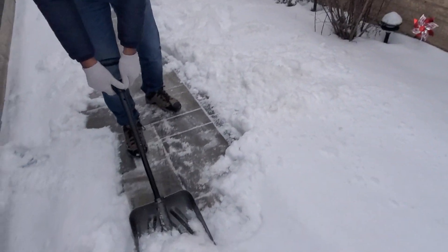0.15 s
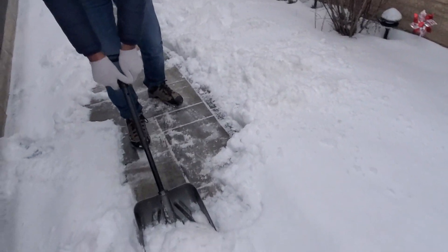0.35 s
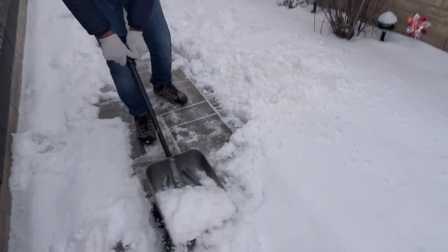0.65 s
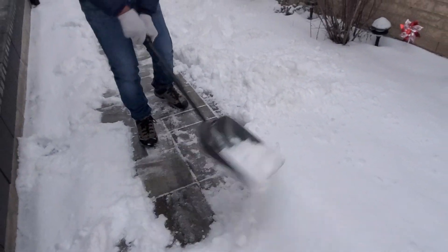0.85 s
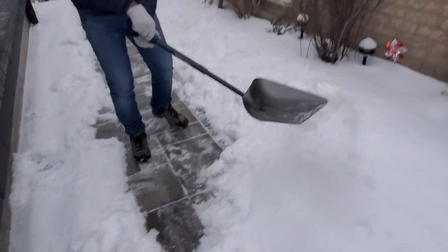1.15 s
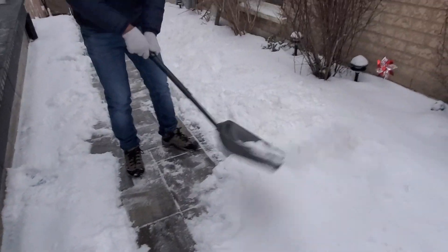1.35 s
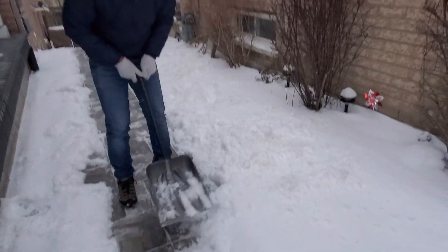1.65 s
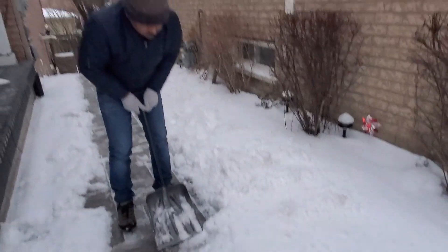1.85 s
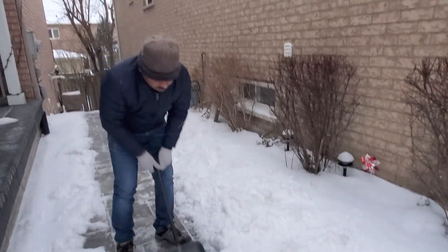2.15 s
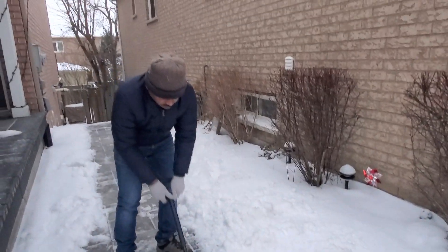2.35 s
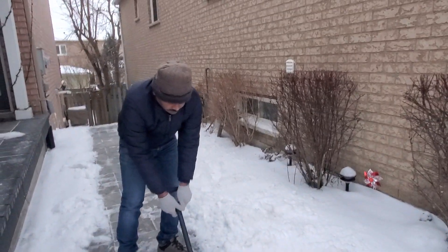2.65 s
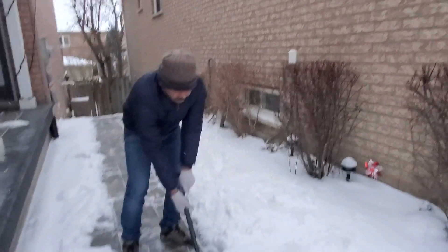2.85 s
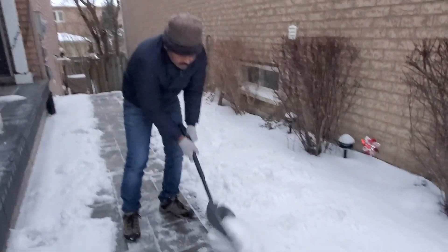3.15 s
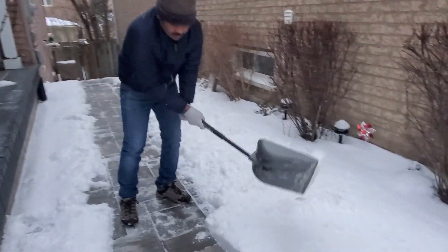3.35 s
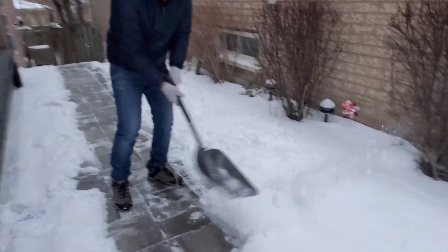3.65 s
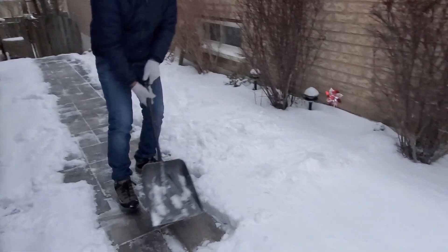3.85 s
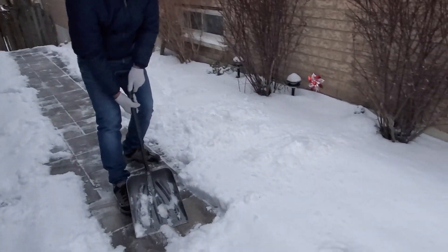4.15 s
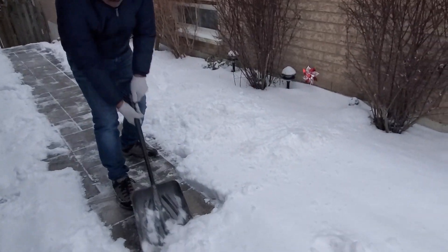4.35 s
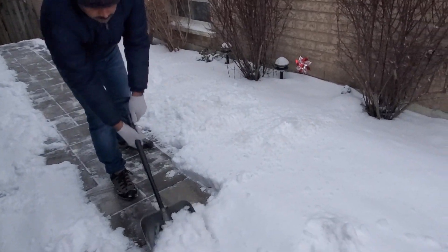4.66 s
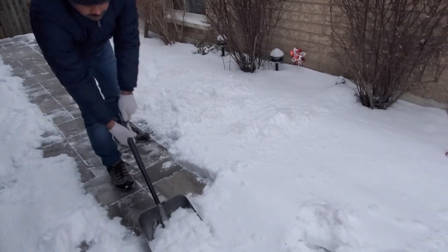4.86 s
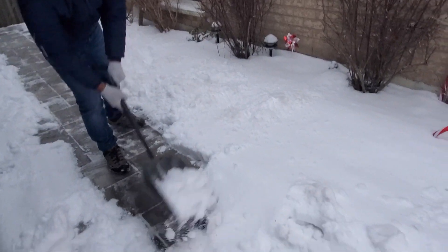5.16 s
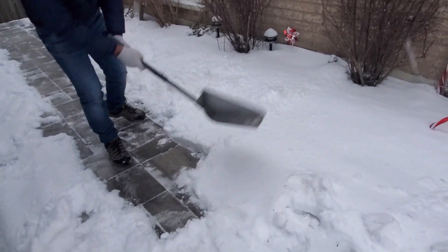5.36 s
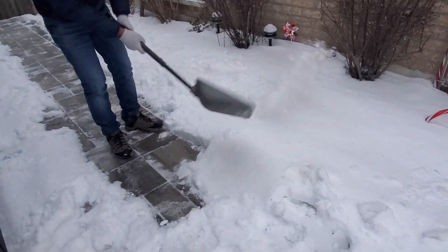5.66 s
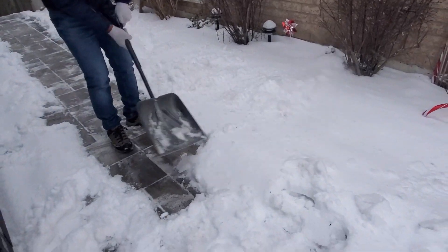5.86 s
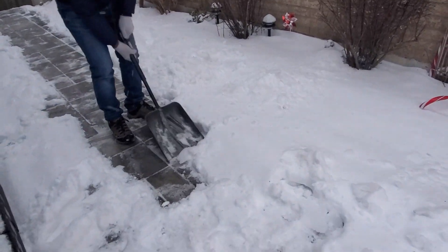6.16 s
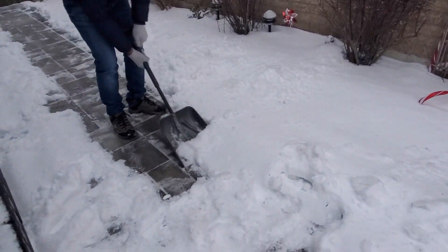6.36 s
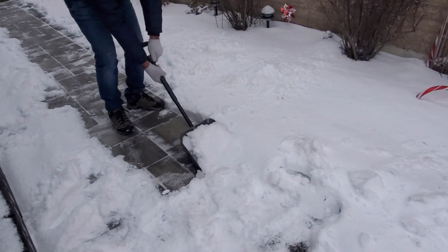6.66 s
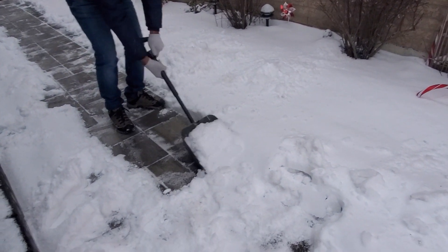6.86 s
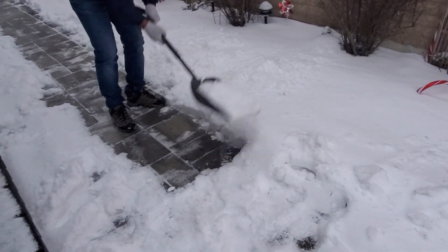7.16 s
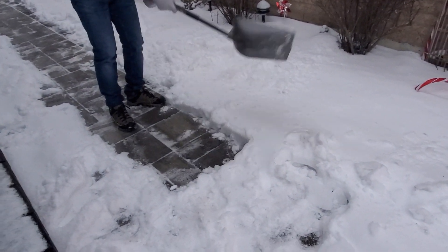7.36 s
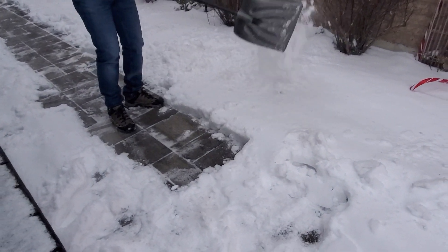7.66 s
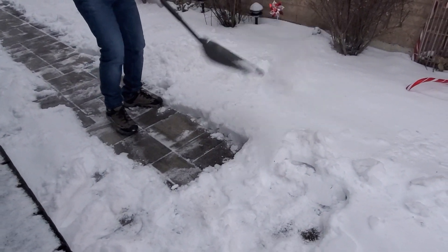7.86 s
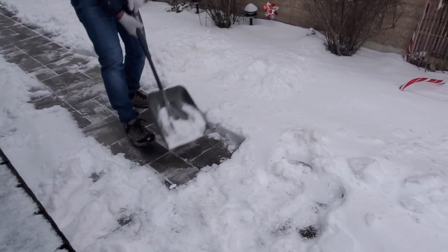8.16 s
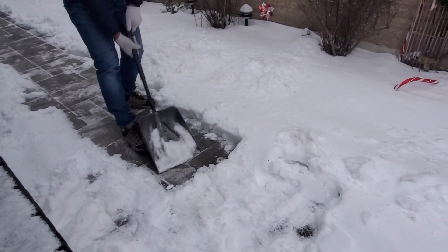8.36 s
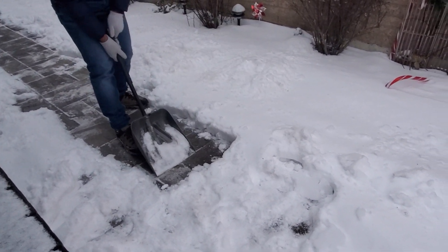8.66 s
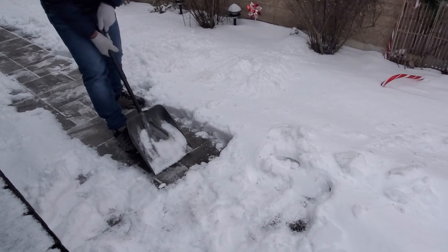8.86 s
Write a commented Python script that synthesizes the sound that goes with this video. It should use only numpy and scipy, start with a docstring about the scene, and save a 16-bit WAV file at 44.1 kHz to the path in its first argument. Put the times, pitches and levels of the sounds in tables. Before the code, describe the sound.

Close outdoor shoveling in a narrow yard between brick walls. A plastic blade rasps over pavers and packs creaking snow, its hollow scoop droning. Pauses follow each shove while thrown snow patters down and boots tap dully. The sharpest cracks and knocks come near the middle, another cluster at six seconds, then gentler scrapes. Wind thumps unevenly on the stereo microphones a few steps away, over faint distant traffic.

```python
"""A plastic snow shovel scrapes over pavers in a narrow yard between two brick houses.
Grains of random clicks drive its edge, scoop and packing snow; joints give bursts that crack and knock.
Hollow bumps ring one mode, thrown snow patters as filtered clicks, boots and handle tap without ringing.
Light wind buffets two microphone ports a few steps away: filtered noise and single pressure swings.
Behind lie a murmur of distant traffic and a far wash, both filtered noise with slow level curves."""
import sys
import numpy as np
from scipy import signal
from scipy.fft import rfft, irfft
from scipy.io import wavfile
from scipy.ndimage import uniform_filter1d, map_coordinates

SR = 44100
rng = np.random.default_rng(int(sys.argv[2]) if len(sys.argv) > 2 else 0)


def int16_out(signal):
    """Quantize to a 16-bit WAV file."""
    q = np.round(np.clip(np.atleast_2d(signal).T, -1, 1) * 32767)
    wavfile.write(sys.argv[1], SR, q.astype(np.int16))


N = 397341
T = np.arange(N) / SR  # s
CONTROL_T = np.arange(0, N / SR, 1 / 1000)  # s, axis of the slow envelopes

# Levels in the tables are relative; some sources, such as the knocks and crunches, add a trim.
# scrape of the edge: [f/Hz, level/dB]
GRIND_SPECTRUM = [(60, -27), (200, -4), (400, -4.5), (950, -13), (1450, 1), (2100, 6), (3200, 1), (4300, 3),
                  (5500, -0.5), (7200, 1.5), (9200, -17.5), (12000, -23), (16000, -6)]
# drone of the blade: [f/Hz, level/dB]
DRONE_SPECTRUM = [(80, -32), (160, -1), (270, -8.5), (420, -7), (700, 7.5), (980, -17.5), (1400, -8),
                  (4000, -25.5)]
# fizz of crushed snow: [f/Hz, level/dB]
FIZZ_SPECTRUM = [(1000, -43), (4000, -2), (7500, -2), (9400, -6.5), (11500, -8.5), (13500, -8.5),
                 (16000, -14.5)]
# modes of the plastic scoop: [f/Hz, level/dB, t60/s]
SCOOP_MODES = [(152, -2, 0.027), (230, -1.5, 0.023), (390, 0.5, 0.043), (468, -6, 0.076),
               (578, -1.5, 0.062), (690, 5, 0.029), (783, 0.5, 0.04), (958, 2, 0.041), (1110, -4, 0.02)]
RATTLE_SPREAD_DB = 1  # unevenness of the grains that shake the scoop


def scraping(grind_db=-1, body_db=-7, fizz_db=-1, pack_db=-1, scoop_db=-2, judder_db=0.5, note_drift=0.013):
    """Stick-slip judder modulates grind, song and scoop; crushed snow has its own judder."""
    (bite, stone, push, crush, pack), note, edge_note = shoves()
    slip = unit(amp(judder_db * waver(per_s=7.5)))
    crush_judder = unit(amp(judder_db * waver(per_s=13)))

    grind = through(bite * slip * grains(per_s=7000, spread_db=3), colour(GRIND_SPECTRUM))
    sing = stone * slip * singing(edge_note)
    fizz = through(crush * crush_judder * grains(per_s=6600, spread_db=1), colour(FIZZ_SPECTRUM))

    shake = slip * grains(per_s=1500, spread_db=RATTLE_SPREAD_DB)
    drifting_note = note * (1 + note_drift * waver(per_s=25))
    bare = np.tanh(stone / (push + 1e-9)) ** 2  # 0 on snow, towards 1 on stone
    hollow = push * hollow_note(shake, drifting_note, bare)
    body_drive = push * slip * grains(per_s=900, spread_db=RATTLE_SPREAD_DB)
    body = through(body_drive, colour(DRONE_SPECTRUM))
    # bare stone also rattles the scoop modes
    scoop_drive = stone * slip * grains(per_s=900, spread_db=2 * RATTLE_SPREAD_DB)
    scoop = through(scoop_drive, ring(SCOOP_MODES))

    rasp = amp(grind_db) * grind + sing + amp(fizz_db) * fizz + grit(np.hypot(bite, stone))
    blade = hollow + amp(body_db) * body + amp(scoop_db) * scoop
    return rasp + blade + amp(pack_db) * pack * creaking()


# shoves of the blade, with load- and angle-dependent notes:
# [full pressure t/s, rise/s, hold/s, release/s, grit level/dB, bare-stone level/dB, drone level/dB,
#  fizz level/dB, creak level/dB, hollow note f/Hz, edge note f/Hz]
SHOVES = [(0.005, 0.078, 0.021, 0.48, -43.5, -47.5, -46.5, -54, -45, 644, 2670),
          (0.22, 0.22, 0.053, 1, -65, -68, -61, -76, -48.5, 655, 2700),
          (0.516, 0.0029, 0.022, 0.16, -43, -48, -48, -44.5, -50, 660, 2040),
          (0.755, 0.39, 0.038, 0.3, -39.5, -50, -47, -47.5, -42.5, 627, 2860),
          (1.831, 0.034, 0.022, 0.34, -46, -46, -44, -45, -61, 440, 1950),
          (2.03, 0.35, 0.13, 0.23, -44.5, -38.5, -39.5, -44.5, -43.5, 535, 2150),
          (2.146, 0.057, 0.077, 0.49, -40.5, -41.5, -45.5, -44.5, -49, 680, 2440),
          (2.306, 0.21, 0.047, 0.59, -48.5, -44.5, -55, -47.5, -52, 717, 2520),
          (3.234, 0.31, 0.046, 0.38, -51, -48.5, -50.5, -49, -56, 620, 2810),
          (3.358, 0.14, 0.12, 0.64, -45, -59, -44.5, -48.5, -47, 620, 2530),
          (3.548, 0.21, 0.15, 0.5, -52.5, -49.5, -51, -47, -49, 683, 3100),
          (4.019, 0.0058, 0.31, 0.26, -57, -48, -54.5, -50.5, -79, 880, 2550),
          (4.225, 0.066, 0.065, 0.11, -55, -43, -56, -44, -73, 804, 2050),
          (4.343, 0.14, 0.021, 0.31, -32, -32.5, -49, -35, -59, 630, 3300),
          (4.483, 0.093, 0.0072, 0.27, -32, -35.5, -40, -47, -58, 707, 2770),
          (4.564, 0.034, 0.058, 0.16, -52, -45, -40.5, -52, -72, 895, 2870),
          (4.777, 0.41, 0.047, 0.81, -43, -52, -42, -45, -57, 535, 3160),
          (4.916, 0.11, 0.058, 0.32, -42.5, -44.5, -42, -63, -47, 566, 2850),
          (6.082, 0.055, 0.033, 0.26, -58, -43, -53, -49, -64, 580, 3080),
          (6.175, 0.11, 0.093, 1, -52, -40, -48, -44.5, -55, 670, 2800),
          (6.591, 0.58, 0.064, 0.22, -36.5, -55, -41, -43.5, -47, 728, 2750),
          (7.906, 0.03, 0.2, 1, -59.5, -67, -57, -51.5, -63, 659, 3260),
          (8.305, 0.43, 0.26, 0.39, -50.5, -70, -48.5, -54, -51.5, 642, 2600),
          (8.605, 0.2, 0.11, .3, -51.5, -54, -48.5, -57, -46.5, 624, 2600),
          (8.787, 0.28, 0.017, 0.25, -39, -43, -40.5, -42.5, -42, 594, 2630),
          (8.927, 0.013, 0.035, 0.44, -51.5, -48.5, -44.5, -48, -67, 500, 2240)]


def shoves():
    """One pressure swell per shove drives edge, blade and snow; stronger shoves weigh more in the notes."""
    pressure = np.array([swell(*row[:4]) for row in SHOVES])
    *_, grit_db, stone_db, drone_db, fizz_db, pack_db, hollow_hz, edge_hz = np.transpose(SHOVES)
    gains = [overlap(pressure, db) for db in (grit_db, stone_db, drone_db, fizz_db, pack_db)]
    hollow_track = leading(pressure, drone_db, hollow_hz)
    edge_track = leading(pressure, stone_db, edge_hz)
    return gains, hollow_track, edge_track


# modes of the stiff scraping edge, before bending: [f/Hz, level/dB, t60/s]
EDGE_MODES = [(2047, 12.5, 0.024), (2220, 7, 0.021), (2444, 7, 0.026), (2592, 6, 0.038), (2770, 8, 0.014),
              (2990, 7.5, 0.034), (3298, 5.5, 0.038), (3890, 8, 0.025), (4250, 6, 0.035), (4660, 4, 0.024),
              (6020, 5, 0.018), (6900, -12, 0.029)]
EDGE_FLEX = 0.012  # rms share by which the modes drift as the edge bends
EDGE_SHIFT_DB = 1.8  # rms swell and fade of each mode as the contact point moves
EDGE_FOCUS_DB = 4.5  # fall per octave away from the edge note


def singing(edge_note, rasp_db=-8, rasp_width_hz=900, edge_low_hz=1750):
    """Edge on bare stone: the blade's angle picks among drifting modes and sets a broad rasp."""
    drive, modes = grains(per_s=2100, spread_db=1), np.zeros(N)
    for hz, db, t60 in EDGE_MODES:
        focus_db = -EDGE_FOCUS_DB * abs(np.log2(hz / edge_note))
        level_db = db + EDGE_SHIFT_DB * waver(per_s=3.8) + focus_db
        modes += amp(level_db) * through(drive, ring([(hz, 0, t60)]))
    read_at = np.cumsum(1 + EDGE_FLEX * waver(per_s=4))  # varying speed bends the pitch
    bent = map_coordinates(modes, [read_at], order=2, mode="mirror")
    sing = unit(bent) + amp(rasp_db) * resonate(drive, edge_note, rasp_width_hz)
    # the narrow edge radiates only treble
    high_pass = signal.butter(4, edge_low_hz, "highpass", fs=SR, output="sos")
    return unit(signal.sosfilt(high_pass, sing))


def hollow_note(shake, note, bare, narrow_hz=75, wide_hz=330, overtone_db=-13):
    """Scoop note: clear when it rides on snow, blurred by rattling on bare stone."""
    overtone = resonate(shake, 2 * note, 2 * narrow_hz)
    clear = resonate(shake, note, narrow_hz) + amp(overtone_db) * overtone
    blurred = resonate(shake, note, wide_hz)
    return np.sqrt(1 - bare) * clear + np.sqrt(bare) * blurred


GRIT_HZ, GRIT_CYCLES = (900, 9000), 3  # nominal range of notes; cycles to decay by 1/e


def grit(force, grit_db=-9, pops_per_s=260, clump_db=2.5, count=20):
    """Grit and ice crystals burst under the edge in clumps, each on one of a set of short notes."""
    t, clumps = T[:400], unit(amp(clump_db * waver(per_s=33)))
    out = np.zeros(N)
    for hz in np.geomspace(*GRIT_HZ, count) * rng.uniform(0.95, 1.05, count):
        decay = np.exp(-hz * t / GRIT_CYCLES)
        pop = np.sin(2 * np.pi * hz * t) * decay * hz * amp(read(GRIND_SPECTRUM, hz))
        out += through(grains(per_s=pops_per_s / count, spread_db=3), pop)
    return amp(grit_db) * force * clumps * unit(out)


# creak of snow packing ahead of the blade: [t/s, f/Hz]
CREAK_NOTE = [(0, 1750), (0.45, 1620), (0.85, 1700), (1.95, 1900), (2.35, 1490), (6.6, 1450), (8.4, 1280)]
# broad noise of packing snow: [f/Hz, level/dB]
PACKING_SPECTRUM = [(300, -28), (800, -7.5), (1280, -0.5), (1650, 2), (2100, -13), (4000, -9), (9000, -40)]


def creaking(creak_db=-1.5, broad_db=-5, creak_width_hz=260):
    """Snow packs in front of the blade: small slips drive a gliding resonance."""
    slips = grains(per_s=1600, spread_db=-0.5)
    creak = resonate(slips, np.interp(T, *np.transpose(CREAK_NOTE)), creak_width_hz)
    broad = through(grains(per_s=900, spread_db=1.5), colour(PACKING_SPECTRUM))
    return amp(creak_db) * creak + amp(broad_db) * broad


# edge meets a paver or joint:
# [t/s, crack level/dB, knock level/dB, knock centre f/Hz, crack centre f/Hz, chatter decay/s]
KNOCKS = [(0.0014, -32.5, -25.5, 724, 2960, 0.0031), (0.0306, -47, -32.5, 780, 3000, 0.0074),
          (0.0775, -52, -35, 570, 3000, 0.0037), (0.8622, -40.5, -34, 560, 2980, 0.022),
          (1.8283, -36, -39, 500, 3500, 0.0058), (1.846, -32, -27, 250, 2060, 0.005),
          (2.1315, -42, -28, 495, 3000, 0.0049), (2.2417, -28.5, -32, 947, 2070, 0.0034),
          (2.8, -43, -43, 483, 2690, 0.0012), (3.328, -36.5, -54, 842, 2550, 0.054),
          (4.02, -45, -33, 370, 3500, 0.0073), (4.2891, -49, -28.5, 398, 3000, 0.01),
          (4.3331, -33, -26, 966, 3000, 0.0048), (4.3619, -25, -27, 781, 4500, 0.004),
          (4.3712, -15, -19.5, 700, 3180, 0.0011), (4.4537, -30, -30, 695, 4000, 0.008),
          (4.468, -21, -30, 700, 4200, 0.0014), (4.4786, -17.5, -22.5, 466, 3240, 0.00047),
          (4.508, -39, -26, 900, 2720, 0.0062), (4.581, -31, -35, 1000, 3000, 0.0021),
          (4.7009, -26, -31, 900, 2300, 0.0016), (4.7085, -48, -26.5, 880, 2500, 0.0012),
          (4.789, -38, -39, 514, 3400, 0.0081), (4.893, -41, -34, 420, 3000, 0.0045),
          (4.9076, -33, -38, 487, 3200, .002), (4.9626, -38, -35, 500, 2800, 0.0034),
          (6.0216, -34.5, -41.5, 960, 2960, 0.013), (6.0744, -30, -27, 970, 3260, 0.0076),
          (6.0869, -34, -30, 300, 3000, 0.0021), (6.1753, -22.5, -19.5, 475, 3070, 0.0037),
          (6.1898, -23, -37, 673, 2980, 0.0023), (6.3791, -25, -35, 676, 3300, 0.0022),
          (6.395, -29, -26.5, 240, 3000, 0.003), (6.6512, -46, -31, 790, 2800, 0.0092),
          (8.3205, -54, -31.5, 490, 2000, 0.0095), (8.3334, -44, -34, 248, 2000, 0.006),
          (8.8057, -34, -28, 450, 2010, 0.0075), (8.815, -33, -30, 170, 2500, 0.0041),
          (8.9239, -45, -32, 640, 3480, 0.0034), (8.938, -38, -32.5, 323, 3500, 0.015)]
CRACK_DB = -3  # trim of the edge cracks


def knocks(knock_db=-1, falloff_db=6, flex_hz=1130):
    """Each catch chatters briefly, cracking the edge and ringing the scoop modes nearest the blow."""
    out = np.zeros(N)
    flex = signal.butter(6, flex_hz, fs=SR, output="sos")  # the plastic gives, softening the blow
    for s, edge_db, blade_db, knock_hz, crack_hz, chatter in KNOCKS:
        blow = burst(chatter)
        crack = through(blow, edge_response(crack_hz))
        nearest = ring(favour(SCOOP_MODES, knock_hz, falloff_db))
        knock = through(signal.sosfilt(flex, blow), nearest)
        add(out, s, at_peak(crack, edge_db + CRACK_DB) + at_peak(knock, blade_db + knock_db))
    return out


def edge_response(centre_hz, ring_db=-2, falloff_db=4, open_hz=3200, muffle_power=3.7):
    """One grain under the edge: dry tick and short ring; low cracks, deep in snow, lose their treble."""
    falloff = falloff_db * max(open_hz / centre_hz, 1) ** muffle_power  # dB per octave
    response = amp(ring_db) * ring(favour(EDGE_MODES, centre_hz, 2 * falloff))
    add(response, 0, colour(favour(GRIND_SPECTRUM, centre_hz, falloff)))
    return response / np.linalg.norm(response)


# loaded scoop bumps over the paving: [t/s, level/dB, f/Hz, chatter decay/s]
BUMPS = [(2.1313, -24.5, 507, 0.0027), (3.1913, -31, 593, 0.0063), (3.221, -35, 602, 0.0087),
         (4.737, -31, 524, 0.0088), (4.815, -28.5, 505, 0.0038), (4.917, -30.5, 456, 0.0047),
         (4.991, -32.5, 412, 0.0033), (8.385, -41, 650, 0.02)]
BUMP_T60_S = 0.056  # snow-damped scoop


def bumps(level_db=-1):
    """Snow cushions the edge, so a bump rings only the hollow note of the scoop."""
    out = np.zeros(N)
    for s, db, hz, chatter in BUMPS:
        bump = through(burst(chatter, snap=11), ring([(hz, 0, BUMP_T60_S)]))
        add(out, s, at_peak(bump, db + level_db))
    return out


# icy crumbs: [f/Hz, level/dB]
SNOW_SPECTRUM = [(150, 0), (500, -2), (1200, -13.5), (2500, 0.5), (4500, 1.5), (7300, 2.5), (9400, -5),
                 (11500, -4), (16000, -4)]
# crusts snap and clods land: [t/s, level/dB, decay/s]
CRUNCHES = [(0.515, -34.5, 0.0016), (1.052, -50, .002), (1.074, -48, .002), (1.1494, -45.5, 0.00093),
            (1.216, -43.5, .002), (1.5465, -47.5, .0015), (1.618, -51, .002), (2.635, -47, 0.00087),
            (3.673, -38, 0.0046), (4.02, -38, .003), (4.787, -29, 0.0044), (5.535, -41, 0.0024),
            (5.613, -48, .002), (6.614, -35, .004), (7.0587, -47, 0.001), (7.2553, -43, .0012),
            (7.7399, -35, 0.0036), (7.757, -32.5, 0.003)]


def loose_snow(crunch_db=-2, clump_db=2, plop_db=-9, tick_db=-8):
    """Crumbs patter in clumps with small ticks and soft plops; crusts and clods give single crunches."""
    crumb, flow = colour(SNOW_SPECTRUM), spills()
    clumps = unit(amp(clump_db * waver(per_s=4)))
    patter = through(flow * clumps * grains(per_s=5800, spread_db=5), crumb)
    ticks = through(flow * grains(per_s=100, spread_db=-1), crumb + colour(PACKING_SPECTRUM))
    plops = through(flow * grains(per_s=35, spread_db=2), colour(DRONE_SPECTRUM))
    out = patter + amp(tick_db) * ticks + amp(plop_db) * plops
    crust = crumb + 0.21 * colour(GRIND_SPECTRUM)
    for s, db, decay in CRUNCHES:
        add(out, s, at_peak(through(burst(decay), crust), db + crunch_db))
    return out


# snow slides off the blade and lands: [thickest t/s, rise/s, hold/s, release/s, level/dB]
SPILLS = [(1.386, 0.44, 0.02, 0.2, -50.5), (1.476, .05, 0.63, 0.12, -67), (1.634, 0.021, .01, 0.086, -53),
          (2.464, 0.14, 0.13, 0.42, -54.5), (3.01, 0.37, 0.042, 0.21, -54.5), (5.627, .005, 0.035, .1, -56),
          (5.68, 0.1, 0.058, 1, -52.5), (6.773, 0.068, 0.13, 0.2, -62), (7.307, 0.039, 0.041, 0.16, -53),
          (7.664, 0.15, .06, 0.63, -53), (7.738, 0.029, 0.023, 0.2, -42.5)]


def spills():
    """Flow of loose snow over time: overlapping swells."""
    swells = [swell(*shape) for *shape, db in SPILLS]
    return overlap(swells, [db for *shape, db in SPILLS])


# dull taps of boots and handle: [t/s, level/dB, decay/s]
TAPS = [(0.265, -37.5, 0.0099), (0.3064, -30.5, 0.003), (3.8398, -38, 0.0013), (3.917, -43, 0.0014),
        (5.363, -39, 0.0013), (5.424, -43, 0.012), (5.70, -48, .025), (5.765, -47.5, 0.024),
        (5.867, -42, 0.0078), (7.171, -47, 0.0024), (7.397, -46, 0.0025), (7.542, -45, .006)]
# colour of a tap: [f/Hz, level/dB]
TAP_SPECTRUM = [(120, 7), (400, 5), (900, 11), (1500, -5.5), (2200, -6), (3500, -22), (8000, -28)]


def taps():
    """Boots and handle give short noise bursts that do not ring."""
    out, tap = np.zeros(N), colour(TAP_SPECTRUM)
    for s, db, decay in TAPS:
        add(out, s, at_peak(through(burst(decay), tap), db))
    return out


PORT_LAG_MS, LAG_DRIFT_MS = 0.3705, 0.022  # mean, rms drift


def yard(x, level_db=-1):
    """The left port hears the direct sound first, by a drifting lag; scatter and echoes come from all sides."""
    lag_ms = PORT_LAG_MS + LAG_DRIFT_MS * waver(per_s=1.5)
    right = map_coordinates(x, [(T - lag_ms / 1000) * SR], order=3)
    direct = np.array([x, right])
    return amp(level_db) * (direct + diffuse(scatter(x) + echoes(x)))


# scattered against direct sound: [f/Hz, level/dB]
SCATTER = [(200, -5), (600, -6), (1500, 0), (4000, -2), (12000, 5)]


def scatter(x, size=256):
    """Rough ground and legs scramble the phase and return the sound about 3 ms later."""
    overlap_size = size * 3 // 4
    hz, _, z = signal.stft(x, SR, nperseg=size, noverlap=overlap_size)
    phase = np.exp(2j * np.pi * rng.random((2, *z.shape)))
    scrambled = z * phase * amp(read(SCATTER, hz))[:, None]
    pair = 2 * signal.istft(scrambled, SR, nperseg=size, noverlap=overlap_size)[1]
    return np.pad(pair, ((0, 0), (size // 2, 0)))[:, :N]


# decay between the walls: [f/Hz, t60/s]
YARD_T60 = [(200, .2), (1000, .22), (4000, .18), (14000, .1)]


def echoes(x, walls_db=-13, wall_delay_s=0.0096):
    """The brick walls return a short, soft tail to each port: noise with a decay set per frequency."""
    size = SR // 4
    hz, when, z = signal.stft(rng.standard_normal((2, size)), SR, nperseg=256)
    decay = np.exp(-np.log(1000) * when / read(YARD_T60, hz)[:, None])
    tail = signal.istft(z * decay, SR)[1][:, :size] * (T[:size] > wall_delay_s)
    return amp(walls_db) * np.array([through(x, port / np.linalg.norm(port)) for port in tail])


# wind rumble: [f/Hz, level/dB]
RUMBLE_SPECTRUM = [(12, -23), (25, 6), (40, -9.5), (68, 7), (100, -0.5), (160, -16), (300, -28), (700, -68),
                   (2000, -62)]
# single eddies hitting the ports: [t/s, left level/dB, right level/dB, f/Hz]
EDDIES = [(0.624, -27.5, -52, 70.6), (0.735, -20, -50, 69), (1.744, -24, -50, 75), (2.059, -30, -38, 78.1),
          (2.296, -22, -48, 68), (2.344, -24, -45, 70), (2.384, -20, -46, 71.6), (3.814, -24.5, -52, 71),
          (4.288, -28, -30, 70.4), (4.768, -18.5, -36, 80), (4.89, -42, -21.5, 70),
          (6.878, -48, -21.5, 74.4), (6.961, -45, -28.5, 114), (7.018, -26, -51, 97),
          (7.059, -29, -35, 102), (7.194, -47, -25, 58), (7.864, -29.5, -54, 103)]


def wind(left_db=6, right_db=-0.5, eddy_db=-2, lump_db=2):
    """Lumpy rumble, unrelated at the two ports, with single eddies as short pressure swings."""
    rumble = np.zeros((2, N))
    for port, db in zip(rumble, (left_db, right_db)):
        lumps = unit(amp(lump_db * waver(per_s=15)))
        port += amp(db) * through(rng.standard_normal(N) * lumps, colour(RUMBLE_SPECTRUM))
    eddies, t = np.zeros((2, N)), T[:SR // 8]
    for s, *ports_db, hz in EDDIES:
        turns = hz * t
        swing = np.sin(2 * np.pi * turns) * turns * np.exp(-turns / 0.37)
        for port, db in zip(eddies, ports_db):
            add(port, s, at_peak(swing, db + eddy_db))
    return rumble * gusts() + eddies


# light breeze between gusts: [t/s, level/dB]
BREEZE = [(0, -57), (2.0, -53), (3.3, -69), (5.0, -54), (6.4, -57.5), (7.6, -62), (9.0, -75)]
# gusts on the ports: [t/s, hold/s, left level/dB, right level/dB]
GUSTS = [(0.35, 0.033, -60, -37), (0.64, 0.083, -38, -52), (1.26, 0.1, -46, -41), (1.767, 0.094, -40, -41),
         (2.082, 0.074, -37.5, -41), (2.315, 0.054, -37.5, -52), (3.817, .16, -45.5, -63),
         (4.285, 0.35, -38.5, -45), (4.723, 0.06, -34.5, -37), (5.167, 0.21, -46.5, -48),
         (5.67, 0.1, -64, -39), (5.952, .12, -50.5, -52), (6.78, 0.45, -61, -36), (6.977, 0.12, -48, -50),
         (7.85, 0.052, -43, -58)]
GUST_RISE_S, GUST_RELEASE_S = 0.17, 0.15


def gusts():
    """Wind strength at each port: short gusts on top of the breeze, powers adding."""
    swells = [swell(s, GUST_RISE_S, hold, GUST_RELEASE_S) for s, hold, *_ in GUSTS]
    *_, left_db, right_db = np.transpose(GUSTS)
    breeze = amp(np.interp(T, *np.transpose(BREEZE)))
    return np.hypot([overlap(swells, left_db), overlap(swells, right_db)], breeze)


# traffic murmur: [f/Hz, level/dB]
TRAFFIC_SPECTRUM = [(60, -2), (150, -7.5), (260, 0.5), (400, -3), (800, -2), (1100, -23), (2500, -21.5)]
# its level curve: [t/s, level/dB]
TRAFFIC_LEVEL = [(0, -56), (1.2, -56), (2.9, -54), (4.0, -58.5), (9.0, -72)]


def traffic():
    """Low murmur of distant traffic: diffuse filtered noise that finally fades."""
    pair = np.array([through(rng.standard_normal(N), colour(TRAFFIC_SPECTRUM)) for _ in range(2)])
    return diffuse(pair) * amp(np.interp(T, *np.transpose(TRAFFIC_LEVEL)))


# far wash: [f/Hz, level/dB]
TOWN_SPECTRUM = [(20, -2.5), (60, 12.5), (150, -10), (300, -12), (500, -17.5), (800, -8.5), (1100, -12.5),
                 (2000, -12), (4000, -22.5), (8000, -26.5), (16000, -31)]
# its level curve: [t/s, level/dB]
TOWN_LEVEL = [(0, -48.5), (1.5, -52), (3.0, -47.5), (4.0, -53), (5.3, -52.5), (7.0, -51.5), (9.0, -56.5)]


def town():
    """Far wash of the neighbourhood: diffuse filtered noise on a slow level curve."""
    pair = np.array([through(rng.standard_normal(N), colour(TOWN_SPECTRUM)) for _ in range(2)])
    return diffuse(pair) * amp(np.interp(T, *np.transpose(TOWN_LEVEL)))


def amp(db):
    """Decibels to gain."""
    return 10 ** (np.asarray(db) / 20)


def unit(x):
    """Scales to rms 1."""
    return x / np.sqrt(np.mean(x ** 2) + 1e-20)


def read(points, hz):
    """Reads a spectrum on a log-frequency axis."""
    f, value = np.transpose(points)
    return np.interp(np.log(hz + 1), np.log(f + 1), value)


def add(mix, s, sound):
    """Mixes a sound in at time s."""
    part = mix[max(round(s * SR), 0):][:len(sound)]
    part += sound[:len(part)]


def through(x, response):
    """Convolves, keeping the length."""
    return signal.oaconvolve(x, response)[:len(x)]


def colour(spectrum, size=8192):
    """Causal (minimum-phase) impulse response of a spectrum, energy 1."""
    log_gain = np.log(amp(read(spectrum, abs(np.fft.fftfreq(size, 1 / SR)))))
    response = np.fft.ifft(np.exp(np.conj(signal.hilbert(log_gain)))).real[:size // 2]
    return response / np.linalg.norm(response)


def ring(modes, size=3000):
    """Impulse response of exponentially decaying modes, energy 1."""
    t, response = np.arange(size) / SR, np.zeros(size)
    for hz, db, t60 in modes:
        response += amp(db) * np.exp(-np.log(1000) * t / t60) * np.cos(2 * np.pi * hz * t)
    return response / np.linalg.norm(response)


def favour(rows, centre_hz, falloff_db):
    """Lowers a spectrum or a set of modes by falloff_db per octave away from a centre."""
    return [(hz, db - falloff_db * abs(np.log2(hz / centre_hz)), *rest) for hz, db, *rest in rows]


def resonate(x, hz, width):
    """Steep resonance that follows the curve hz, rms 1."""
    turn, r = np.exp(2j * np.pi * np.cumsum(hz) / SR), np.exp(-np.pi * width / SR)
    baseband = signal.lfilter([1], [1, -2 * r, r * r], x * turn.conj())
    return unit((turn * baseband).real)


def waver(per_s, size=10000):
    """Smooth random curve of rms 1, weakening above the given rate."""
    hz = np.fft.rfftfreq(size, T[-1] / size)
    slow = irfft(rfft(rng.standard_normal(size)) / (1 + (hz / per_s) ** 2), size)
    return np.interp(T, np.linspace(0, T[-1], size), unit(slow))


def grains(per_s, spread_db):
    """Random clicks, rms 1; positive spread: few large ones, negative: few small ones."""
    draw = rng.random(N) * SR / per_s
    sign = 2 * rng.integers(0, 2, N, dtype=np.int8) - 1
    hit, out = draw < 1, np.zeros(N)
    out[hit] = sign[hit] * amp(spread_db * np.minimum(-np.log(draw[hit]), 4))
    return unit(out)


def burst(decay, snap=6, size=3000):
    """Sharp first contact, then a cluster of tiny impacts that dies away."""
    blow = rng.standard_normal(size) * np.exp(-T[:size] / max(decay, 1e-4))
    blow[0] += snap
    return blow


def at_peak(x, db, size=220):
    """Scales a hit so that its loudest 5 ms have this rms level."""
    return amp(db) * x / np.sqrt(uniform_filter1d(x ** 2, size).max())


def diffuse(pair, spacing_ms=0.33):
    """Sound from all sides: alike at both ports in the bass, unrelated in the treble."""
    size = pair.shape[1]
    alike = np.sinc(2 * np.fft.rfftfreq(size, 1 / SR) * spacing_ms / 1000)
    a, b = rfft(pair)
    return irfft([a, alike * a + np.sqrt(1 - alike ** 2) * b], size)


RISE_POWER = 2.68  # a swell starts gently and steepens
RELEASE_DB = 41  # fall over one release time


def swell(s, rise, hold, release):
    """Envelope that climbs to 1 at time s, holds and dies away."""
    climb = np.clip(1 + (CONTROL_T - s) / max(rise, 1e-3), 0, 1) ** RISE_POWER
    return climb * amp(-RELEASE_DB * np.maximum(CONTROL_T - s - hold, 0) / max(release, 1e-3))


def overlap(swells, levels_db):
    """Gain over time of several swells, whose powers add."""
    return np.interp(T, CONTROL_T, np.sqrt(amp(levels_db) ** 2 @ np.square(swells)))


def leading(swells, levels_db, notes_hz):
    """Pitch over time: power-weighted mean, gliding towards the note of the strongest swell."""
    weight = (amp(levels_db)[:, None] * swells) ** 2 + 1e-20
    return np.interp(T, CONTROL_T, notes_hz @ weight / weight.sum(axis=0))


def scene():
    """Shovel, snow and boots in the yard, with wind, traffic and the far wash."""
    shovel = scraping() + knocks() + bumps()
    return yard(shovel + loose_snow() + taps()) + wind() + traffic() + town()


# right port against left: [f/Hz, level/dB]
RIGHT_PORT = [(100, -1), (350, 1.5), (650, -2), (1100, 0.5), (2600, 0), (3300, 4.5), (4400, 4.5),
              (5500, 0.5), (7000, 2.5), (8200, -0.5), (9500, -3), (11300, 4.5), (14500, -3.5)]
CUTOFF_HZ = 15950


def record(dry):
    """Colours the right port, then low-passes both."""
    right = irfft(rfft(dry[1]) * amp(read(RIGHT_PORT, np.fft.rfftfreq(N, 1 / SR))), N)
    low_pass = signal.firwin(801, CUTOFF_HZ, window=("kaiser", 9), fs=SR)
    return signal.oaconvolve(np.array([dry[0], right]), low_pass[None], "same", axes=1)


dry = scene()
out = record(dry)
int16_out(out)
```